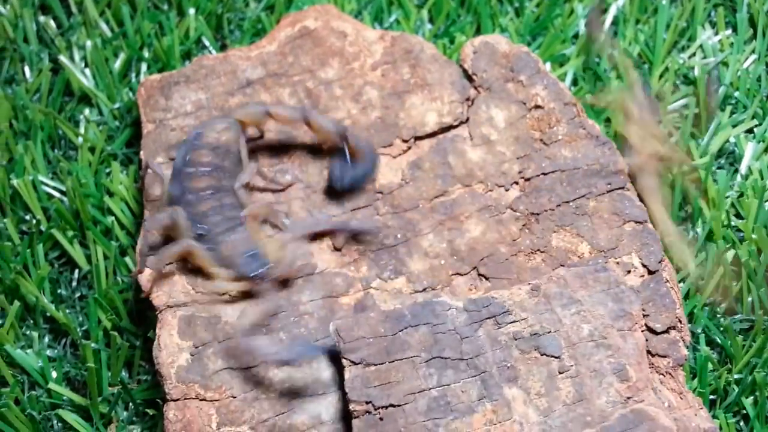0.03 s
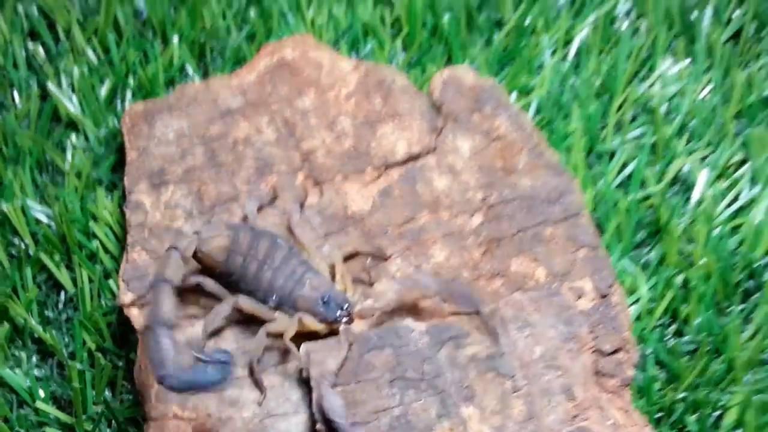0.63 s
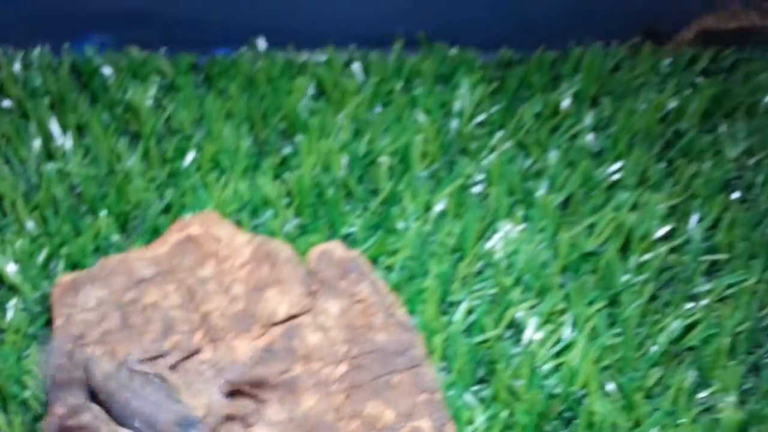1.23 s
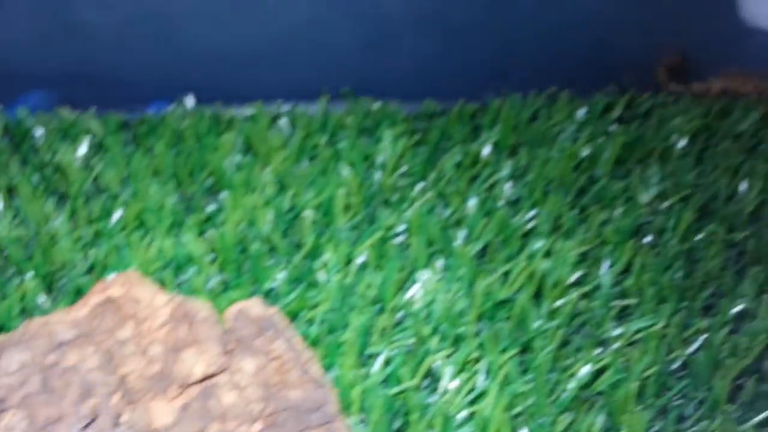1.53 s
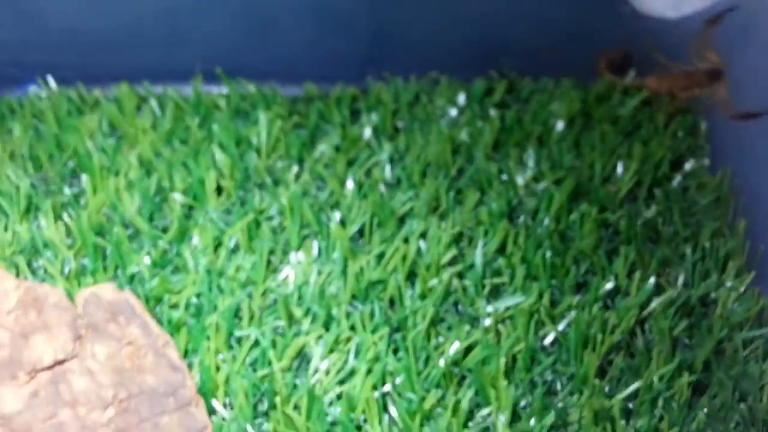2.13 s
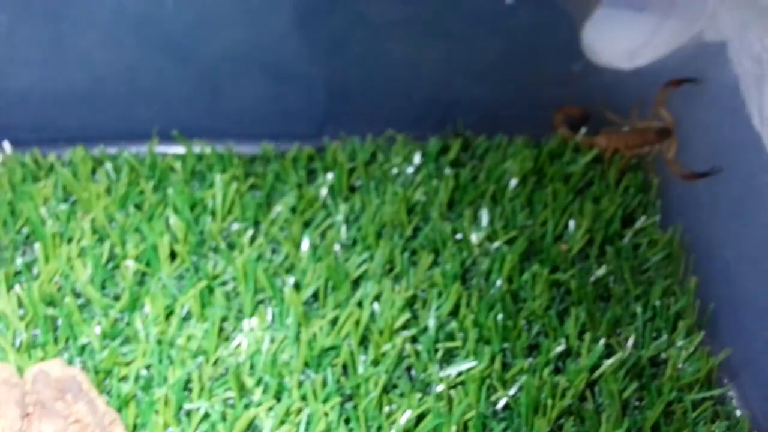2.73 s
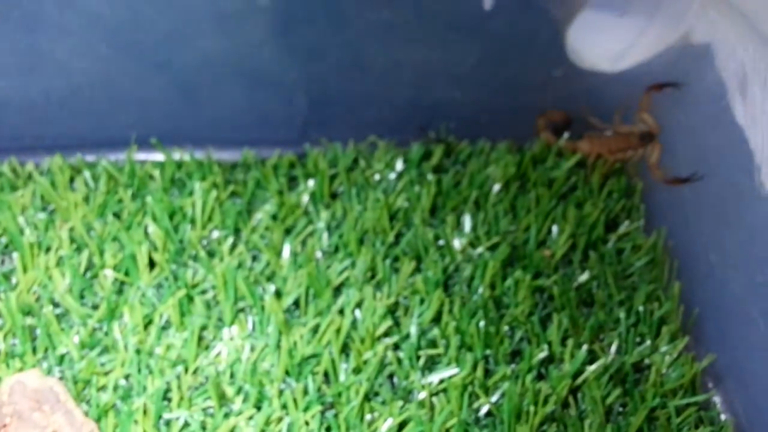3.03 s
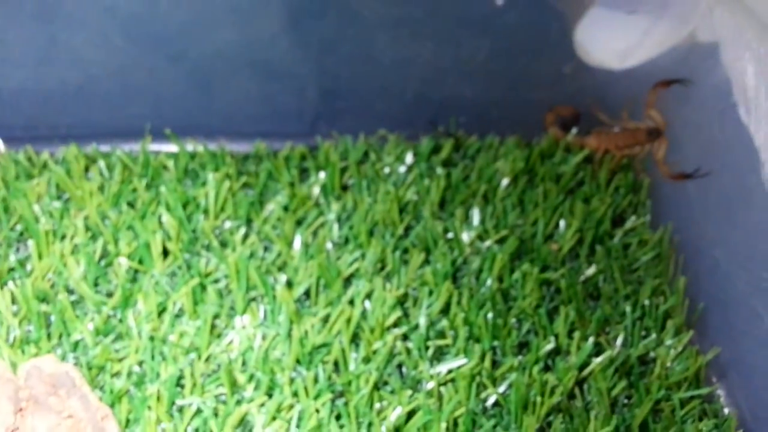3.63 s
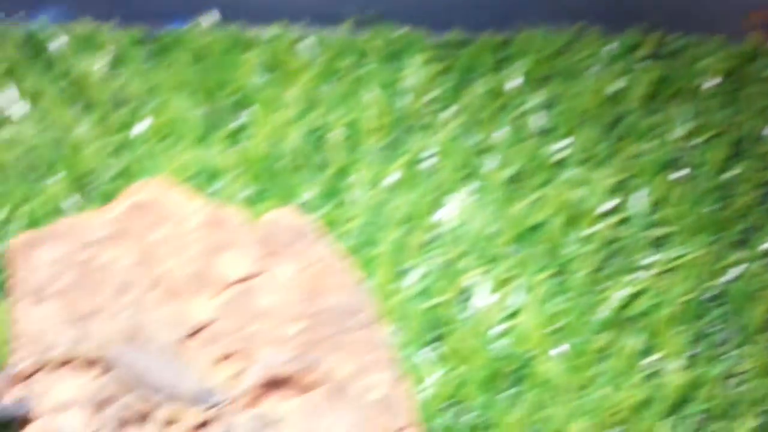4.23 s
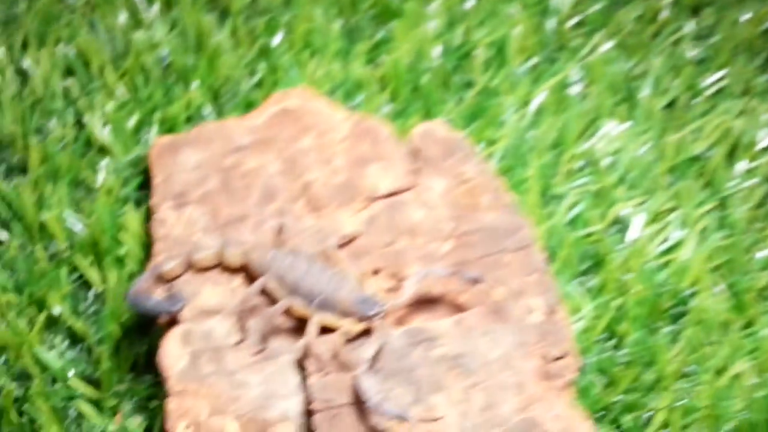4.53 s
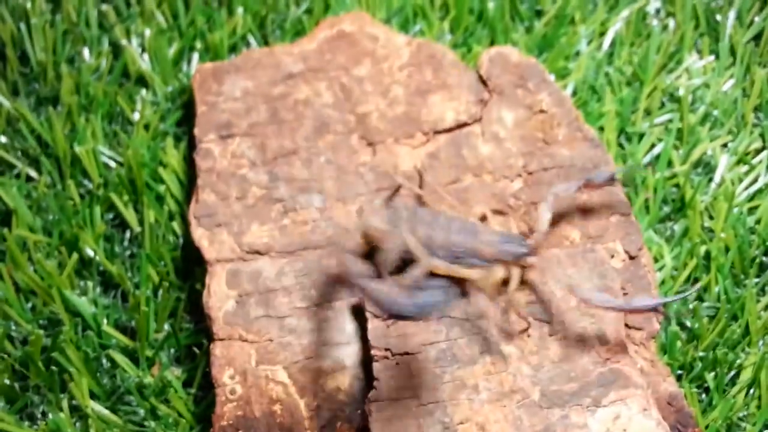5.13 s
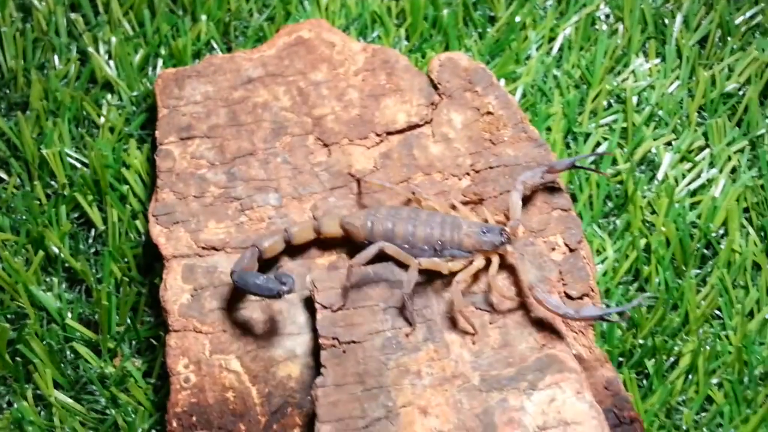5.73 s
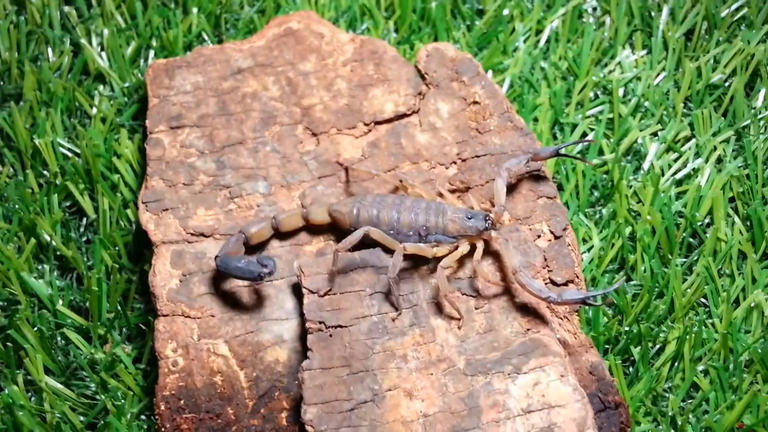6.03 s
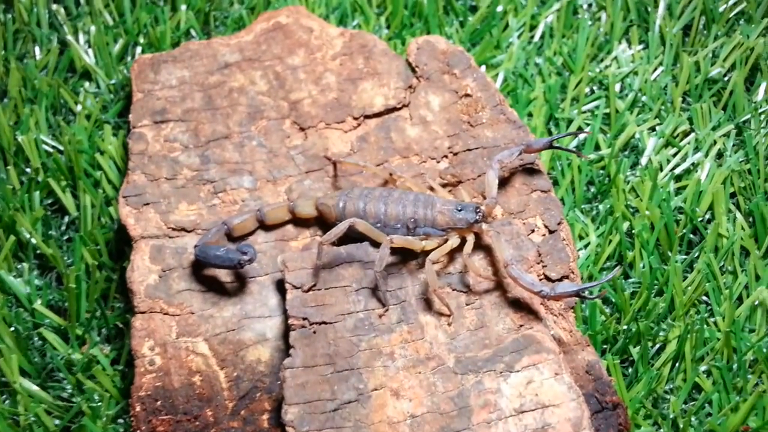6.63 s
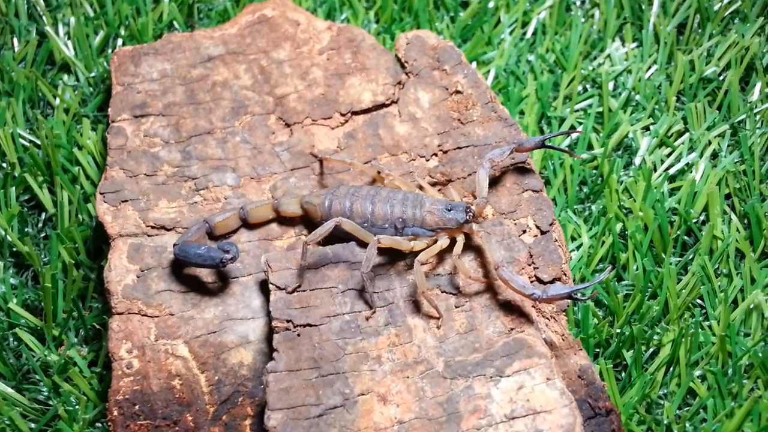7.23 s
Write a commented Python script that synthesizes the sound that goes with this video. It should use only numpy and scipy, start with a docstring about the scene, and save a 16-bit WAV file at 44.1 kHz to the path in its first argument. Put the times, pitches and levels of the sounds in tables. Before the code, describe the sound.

Scorpions scrabble over bark and artificial grass in a plastic tub, making a dry rustle with sharp ticks and short scrapes for about two seconds. Fingers thud against the microphone on the left, ending in one loud knock and a short rubbing groan. After a lull, a few more bumps, rubs and clicks follow. A small bird chirps far off throughout, over soft air noise and a fan in a quiet room.

```python
"""A dry rustle with sharp ticks and short scrapes: scorpions scrabble over bark and artificial grass
in a plastic tub. Their feet slip, snap and drag, and each touch makes the bark and tub ring.
Fingers bump and rub a hand-held camera beside its left microphone, making thuds, hiss and a groan.
Far off, a small bird chirps, and background hiss rises briefly around each chirp.
Air noise and a fan fill the quiet room; near the end the fan's soft whirr swells and fades."""
import sys
import numpy as np
from scipy import signal
from scipy.fft import rfft, irfft, next_fast_len
from scipy.io import wavfile
from scipy.ndimage import uniform_filter1d, map_coordinates

SR = 44100
rng = np.random.default_rng(int(sys.argv[2]) if len(sys.argv) > 2 else 0)


def file_out(sig):
    """Save sig as 16-bit WAV at sys.argv[1]."""
    # one column per channel
    cols = np.atleast_2d(sig).T
    # limit, then scale
    lim = np.clip(cols, -1, 1)
    pcm = np.round(lim * 32767).astype(np.int16)
    wavfile.write(sys.argv[1], SR, pcm)


N = 325017
TIME = np.arange(N) / SR

# Tone of the rustle, from low to high: f/Hz, level/dB
RUSTLE_TONE = [(200, -2), (400, -7), (550, 4), (750, -1.5), (1000, -1), (1600, -1.5), (2600, -0.5),
               (4000, -0.5), (7000, -0.5), (9000, -7.5), (11000, -13.5), (15000, -21)]
def rustle(slips_per_s=1150, clump_db=3, spread_db=5):
    """Feet make clumps of tiny slips, each with its own pitch, blurred by echoes inside the tub."""
    slipping = rng.random(N) < slips_per_s * from_db(clump_db * drift(60)) / SR
    sizes = from_db(spread_db * np.minimum(rng.exponential(1, N), 3))
    slips = slipping * sizes * rng.choice([-1, 1], N)
    slips = slips * (1 + 1.85 * rng.standard_normal((2, N)))  # different at each microphone
    pitches = np.geomspace(400, 13000, 20)
    choice = rng.integers(0, len(pitches), N)
    grains = rms_one(sum(resonate(slips * (choice == k), hz, hz / 4) for k, hz in enumerate(pitches)))
    blurred = late_left(grains) + from_db(.5) * echoes(grains, fade_s=.098)
    texture = rms_one(colour(tub(blurred, ring_db=-14), RUSTLE_TONE))
    return scrabbling() * from_db(1) * texture * pan(.73)


# Bursts of scrabbling: start t/s, length/s, level/dB
BURSTS = [(0.0, 0.38, -48), (0.462, 0.33, -50.5), (0.747, 0.64, -51), (1.447, 0.29, -51),
          (1.861, 0.012, -48), (1.988, 0.017, -48.5), (5.717, 0.02, -62)]
def scrabbling(attack_s=.023, settle_db=-8, slide_db=-24.5, slide_s=.014):
    """How strong the rustle is: feet move, the grass settles, claws slide on after loud ticks."""
    power = 0
    for start, length, db in BURSTS:
        feet = gesture(start, length, attack_s, release_s=.0098)
        grass = from_db(settle_db) * gesture(start, length, attack_s, release_s=.099)
        power = power + (from_db(db) * np.maximum(feet, grass)) ** 2
    for s, db, *_ in LOUD_TICKS:
        slide = from_db(db + slide_db) * np.exp(-TIME[:SR // 4] / slide_s)
        add(power, s, slide ** 2)
    return np.sqrt(power)


# The loudest snaps of claws, bark and grass blades:
# t/s, level/dB, brightness/(dB per octave), left minus right/dB, pitch f/Hz, bass cut f/Hz
LOUD_TICKS = [(0.0198, -31, -0.5, -3, 2220, 700), (0.0575, -35, -2.5, 2, 2000, 700),
              (0.0829, -35.5, 2, 3, 2040, 900), (0.1573, -34, 16, -7, 3480, 1500),
              (0.1965, -36.5, 35, -13, 3500, 1500), (0.345, -38, 16, -6, 3600, 1500),
              (0.471, -26.5, -1, 2, 2370, 587), (0.5054, -33.5, 12, -3, 2800, 1200),
              (0.552, -35.5, 1.5, 0, 2730, 1000), (0.656, -28, 2.5, 3, 1610, 600),
              (0.7768, -21.5, 7.5, -4, 1590, 500), (0.9168, -32.5, -0.5, -3, 3800, 1500),
              (0.9673, -29, 2, 0, 1800, 700), (0.973, -35.5, -3, 1, 2380, 900),
              (0.997, -39, 4, -6, 3900, 1500), (1.0071, -22.5, -1.5, -7, 2560, 436),
              (1.0101, -26, -2.5, 16, 1580, 503), (1.1278, -34, 0, 6, 3730, 1000),
              (1.366, -39.5, -3, 2, 2400, 1200), (1.4459, -35, -4.5, -1, 2620, 696),
              (1.551, -30.5, 11, -7, 2900, 1200), (1.622, -33.5, 17, 3, 3600, 1500),
              (1.6962, -35.5, 4, -3, 3440, 1193), (1.9148, -27.5, 2.5, -3.5, 1830, 800),
              (1.9727, -35, -4, 1, 1850, 700), (1.984, -36.5, -1, 3, 1850, 700),
              (4.874, -36.5, 17, 12, 3050, 1500), (5.332, -20.5, -1, -1, 3400, 1500),
              (7.197, -48.5, -1, 6, 1280, 900)]
# Tone of a snap: f/Hz, level/dB
SNAP_TONE = [(200, 20), (800, 3), (1900, 4), (2600, 2.5), (3500, -0.5), (4400, 2), (7400, -1), (9500, -9),
             (12000, -24), (15000, -31)]
def ticks(crack_s=.00079, rise_s=.000076, scatter_s=.0048, gain_db=-3.5):
    """A tiny crack reaches both microphones directly; the scatter after it is different at each."""
    out, t = np.zeros((2, N)), TIME[:SR // 20]
    for s, db, brightness, side_db, pitch_hz, cut_hz in LOUD_TICKS + light_ticks():
        noise = rng.choice([-1, 1], (3, len(t)))
        scatter = from_db(-11) * noise[:2] * np.exp(-t / scatter_s)
        crack = (noise[2] * np.exp(-t / crack_s) + scatter) * (1 - np.exp(-t / rise_s))
        ringing = tub(struck_spot(crack, pitch_hz), ring_db=-13)
        tone = [(hz, level + brightness * np.clip(np.log2(hz / 4000), -1, .7)) for hz, level in SNAP_TONE]
        snap = cut(colour(ringing, tone), cut_hz, "high", order=4)
        snap /= np.sqrt(np.mean(snap[:, :SR // 200] ** 2, axis=1, keepdims=True))  # by its first 5 ms
        add(out, s, late_left(snap) * from_db(db + gain_db) * pan(side_db))
    return out + from_db(-15.5) * echoes(out, fade_s=.13)


def light_ticks(per_s=12, pitch_hz=2800, cut_hz=900):
    """Lighter ticks fall at random within the bursts, as rows like those of LOUD_TICKS."""
    rows = []
    for start, length, db in BURSTS:
        after = np.cumsum(rng.uniform(.3, 1.7, 16)) / per_s
        strength, tilt, side, place = rng.standard_normal((4, 16))
        levels = db + 3 + 3 * strength
        pitches = pitch_hz * 2 ** (.42 * np.clip(place, -2, 2))
        candidates = np.c_[start + after, levels, 6 * (1 + tilt), 5 * side, pitches, np.full(16, cut_hz)]
        rows += list(candidates[after < length])
    return rows


# A claw drags over ridges of bark: start t/s, length/s, level/dB, pitch f/Hz
CLAW_DRAGS = [(0.562, 0.053, -55.5, 2830), (0.868, 0.036, -50.5, 2300), (1.021, 0.075, -48.5, 3570),
              (1.118, 0.048, -47.5, 2560), (1.198, 0.055, -52, 3530), (1.301, 0.042, -51, 3430)]
def scrapes(slips_per_s=320, spread_db=4, slip_s=.00051):
    """A dragged claw catches and slips unevenly, each slip a tiny crack that rings the bark."""
    out, t = np.zeros((2, N)), TIME[:SR // 5]
    for start, length, db, pitch_hz in CLAW_DRAGS:
        when = np.cumsum(rng.uniform(.3, 1.7, 64)) / slips_per_s
        sizes = from_db(spread_db * rng.standard_normal(len(when)))
        slips = sum(size * (t >= s) * np.exp(-np.abs(t - s) / slip_s)
                    for s, size in zip(when, sizes) if s < length)
        ringing = struck_spot(slips * rng.standard_normal(len(t)), pitch_hz)
        grit = cut(colour(ringing, SNAP_TONE), 1200, "high")
        add(out, start, from_db(db) * rms_one(grit) * np.sqrt(length / t[-1]))
    return late_left(out) + echoes(out, fade_s=.073)


def skid(start_s=.005, length_s=.12, hz=1920, db=-49):
    """A claw skids on the tub's wall: rubbing noise rings at one pitch in a short, rasping squeal."""
    squeal = rms_one(resonate_twice(rng.standard_normal((2, N)), hz, hz / 10))
    return from_db(db) * arch(start_s, length_s) * squeal


# Ringing notes of a struck spot: multiple of its pitch, width/Hz, level/dB
SPOT_NOTES = [(1, 190, 6), (1.85, 380, 7), (3.1, 450, 0)]
def struck_spot(x, pitch_hz):
    """Each spot of bark or grass rings with a pitch of its own."""
    return x + sum(from_db(db) * resonate(x, pitch_hz * ratio, width) for ratio, width, db in SPOT_NOTES)


# Ringing notes of the tub and bark: f/Hz, width/Hz, level/dB
TUB_NOTES = [(1420, 120, -17), (1830, 34, -12), (3730, 120, 9), (4990, 200, -3), (5240, 83, 6),
             (6840, 790, 6)]
def tub(x, ring_db):
    """A touch is heard directly and through the ringing of tub and bark."""
    return x + sum(from_db(ring_db + db) * resonate(x, hz, width) for hz, width, db in TUB_NOTES)


# Fingers bump the camera case: t/s, thud level/dB, rough pitch f/Hz, grit level/dB, scuff time/s
FINGER_BUMPS = [(0.223, -29, 534, -31.5, 0.0019), (0.2324, -25, 520, -46, 0.0012),
                (0.235, -13.5, 383, -34.5, 0.0023), (0.2741, -19, 286, -33.5, 0.0019),
                (0.62, -25, 470, -38, 0.0023), (0.697, -22, 287, -50, .003),
                (0.814, -18.5, 373, -52, 0.0024), (0.8537, -24, 320, -46, 0.0029),
                (0.956, -24, 437, -49, 0.0018), (1.0151, -16, 286, -42, 0.0027),
                (1.1125, -14, 395, -37, 0.00243), (1.17, -14.5, 375, -37, .001),
                (1.1746, -21, 392, -40.5, 0.0021), (1.214, -18.5, 294, -44, 0.0046),
                (1.403, -17, 402, -38.5, .0012), (1.49, -17, 342, -40.5, 0.0016),
                (1.594, -17, 373, -35.5, 0.0014), (1.6, -15.5, 334, -39, 0.0021),
                (1.675, -21, 296, -42, 0.0013), (1.684, -25, 350, -41, .003),
                (2.0352, -10.5, 423, -21, 0.0025), (2.0391, 0, 393, -22, 0.0016),
                (2.055, -10.5, 456, -34, 0.0018), (3.427, -24, 500, -59, 0.0024),
                (4.847, -22, 650, -32, .004), (4.945, -14, 477, -30, 0.00089),
                (4.9713, -28, 337, -37, 0.00033), (5.2246, -15, 384, -28.5, 0.0013),
                (5.304, -21, 436, -39, .0007), (5.5408, -29.5, 450, -49, 0.0013)]
# Tone of skin sliding on the case: f/Hz, level/dB
SKIN_TONE = [(100, -3), (200, 11.5), (500, 16), (900, 5), (1600, 7), (2600, 1.5), (4000, -2), (6200, 0.5),
             (8500, -7.5), (11000, -17), (15000, -30)]
def bumps(fade_cycles=.31, ring_hz=1300, grit_gain_db=2.5, judder_db=-10):
    """A bump pushes the case in and out; the fingertip scuffs and judders, never ringing the same."""
    out, t = np.zeros(N), TIME[:SR // 25]
    for s, db, hz, grit_db, scuff_s in FINGER_BUMPS:
        cycles = hz * t * (.6 + .5 * np.exp(-t / .0027))  # the swing slows as the soft fingertip settles
        fade = np.exp(-cycles / (fade_cycles * rng.uniform(.85, .95)))
        thud = -np.sin(2 * np.pi * cycles) * (1 - np.exp(-cycles / .38)) * fade
        scuff = rng.standard_normal(len(t)) * t * np.exp(-t / scuff_s)
        ring = resonate(scuff, ring_hz * 2 ** rng.uniform(-.73, .42), width=320)
        grit = cut(colour(scuff + from_db(-4) * ring, SKIN_TONE), 680, "high")
        grit /= np.sqrt(np.sum(grit ** 2) / (SR // 150))
        judder = resonate_twice(scuff, hz, hz)
        knock = thud / np.abs(thud).max() + from_db(judder_db) * judder / np.abs(judder).max()
        add(out, s, from_db(db) * knock)
        add(out, s - scuff_s / 2, from_db(grit_db + grit_gain_db) * grit)
    return cut(out, 115, "high")


# Fingers slide on the case: start t/s, length/s, level/dB
FINGER_STROKES = [(0.766, 0.017, -37), (2.026, 0.14, -35.5), (4.455, 0.062, -52.5), (4.654, 0.011, -45),
                  (4.744, 0.007, -40.5), (4.794, 0.024, -51.5), (4.843, 0.0065, -36.5),
                  (4.928, 0.023, -47.5), (5.055, 0.016, -50), (5.154, 0.064, -42), (5.533, 0.0058, -58),
                  (7.198, 0.0072, -47.5)]
def rubbing(gain_db=1, rough_db=2):
    """Skin sliding over the case makes a rough hiss."""
    pressure = sum(from_db(db) * gesture(start, length) for start, length, db in FINGER_STROKES)
    roughness = from_db(gain_db + rough_db * drift(350))
    hiss = rms_one(colour(rng.standard_normal(N), SKIN_TONE))
    return cut(pressure * roughness * hiss, 73, "high")


def groan(start_s=2.063, length_s=.084, db=-24, fade_db_per_s=104, start_hz=390, rise_hz_per_s=2300):
    """A finger drags hard, sticking and slipping: higher as it speeds up, quieter as it lets go."""
    since = np.clip(TIME - start_s, 0, length_s)
    level = gesture(start_s, length_s) * from_db(db - fade_db_per_s * since)
    hz = (start_hz + rise_hz_per_s * since) * (1 + .15 * drift(600))
    tone = np.sin(2 * np.pi * np.cumsum(hz) / SR) * from_db(3.5 * drift(220))
    rasp = rms_one(resonate(rng.standard_normal(N), hz=400, width=250))
    return level * rms_one(tone + .55 * rasp)


# The bird's main calls: middle t/s, level/dB
BIRD_CALLS = [(0.617, -43.5), (1.488, -45.5), (2.079, -45), (2.841, -43.5), (3.64, -45.5), (4.832, -44),
              (6.254, -43.5), (7.315, -44)]
# Its other thin peeps: middle t/s, length/s, f/Hz, pitch glide/Hz, level/dB
BIRD_PEEPS = [(0.487, 0.091, 5180, -51, -48), (0.561, 0.044, 5190, -100, -46.5),
              (4.804, 0.043, 4910, -100, -49.5), (4.875, 0.037, 5120, 95, -52),
              (5.648, 0.062, 5800, 700, -66), (6.125, 0.035, 5600, 206, -64.5)]
def bird_notes(length_s=.056, call_hz=4930, glide_hz=-240, lead_hz=4770):
    """All the notes: falling chirps, no two alike, a faint lead-in to each, and the peeps."""
    vary = 1 + .2 * rng.uniform(-.77, 1, (len(BIRD_CALLS), 2))
    calls = [(s, length_s * slow, call_hz, glide_hz * steep, db)
             for (s, db), (slow, steep) in zip(BIRD_CALLS, vary)]
    leads = [(s - .031, length_s, lead_hz, 0, db - 19) for s, db in BIRD_CALLS]
    return calls + leads + BIRD_PEEPS


def bird(notes, buzz_depth_hz=120, buzzes_per_s=110):
    """Thin, buzzy gliding whistles with a short trail of echoes."""
    song = np.zeros(N)
    for s, length, hz, glide_hz, db in notes:
        along = np.linspace(-.5, .5, int(length * SR))
        buzz_cycles = buzzes_per_s * along * length * rng.uniform(.75, 1.16) + rng.random()
        pitch = hz + glide_hz * along + buzz_depth_hz * np.sin(2 * np.pi * buzz_cycles)
        loudness = from_db(db) * np.cos(np.pi * along)
        add(song, s - length / 2, loudness * np.sin(2 * np.pi * np.cumsum(pitch) / SR))
    return (song + from_db(.5) * echoes(song, fade_s=.12)) * pan(3.9)


def background_hiss(notes, gain_db=-3, late_s=.0062):
    """Background hiss rises briefly around each chirp."""
    swell = sum(from_db(db) * arch(s - length / 2 + late_s, length) for s, length, _, _, db in notes)
    tone = [(1000, 11), (3000, .5), (5500, 0), (9000, -3.5), (14000, -12)]
    hiss = rms_one(colour(rng.standard_normal((2, N)), tone))
    return from_db(gain_db) * uniform_filter1d(swell, size=2600) * hiss * pan(3.9)


# Tone of the room's air: f/Hz, level/dB
AIR_TONE = [(15, -40), (35, -26), (53, 1.5), (93, 4), (207, -11), (301, -11), (335, -7.5), (373, -18.5),
            (438, -23), (655, -13), (2700, -25.5), (3200, -30.5), (13800, -39.5), (15000, -59)]
# How alike it is at the two microphones: f/Hz, likeness (0 or less: unrelated, 1 or more: the same)
AIR_LIKENESS = [(40, 9), (100, 0.7), (250, 0.4), (600, 2.35), (2000, -0.67), (12000, 0.28)]
# Which side it leans to: f/Hz, left minus right/dB
AIR_BALANCE = [(60, -2), (200, 3.5), (600, 8.5), (2000, 8), (6000, 4), (14000, -1)]
def air(db=-50):
    """Steady air noise, alike at both microphones in the deep bass."""
    hz = np.fft.rfftfreq(N, 1 / SR)
    alike = np.clip(at_hz(AIR_LIKENESS, hz), 0, 1)
    shared, opposed = rfft(rng.standard_normal((2, N)))
    side = np.array([[1], [-1]])
    noise = np.sqrt(1 + alike) * shared + side * np.sqrt(1 - alike) * opposed
    tone = from_db(at_hz(AIR_TONE, hz) + side * at_hz(AIR_BALANCE, hz) / 2)
    return from_db(db) * rms_one(irfft(noise * tone, N))


# The fan's hums and whirrs: f/Hz, width/Hz, level/dB
FAN_NOTES = [(58.9, 9.1, -60), (267.8, 48, -59.5), (301.6, 21, -59), (367.4, 87, -54), (2560, 200, -81.5),
             (5080, 340, -79.5)]
def fan(gain_db=-2):
    """A distant fan drones in a few narrow bands of noise."""
    noise = rng.standard_normal(N) + .34 * rng.standard_normal((2, N))
    return sum(from_db(db + gain_db) * rms_one(resonate_twice(noise, hz, width))
               for hz, width, db in FAN_NOTES)


def whirr_swell(start_s=6.4, length_s=.85, hz=2400, db=-67):
    """The fan's soft, fluttering whirr swells and fades."""
    swell = arch(start_s, length_s) * from_db(3 * drift(30))
    return from_db(db) * swell * rms_one(resonate_twice(rng.standard_normal((2, N)), hz, hz / 3))


# The room's noise rises and falls as the camera moves: t/s, air level/dB, fan level/dB
ROOM_SWELLS = [(0, -1, 6), (.9, 5.5, 7.5), (1.5, 6, 3.5), (2.3, 0, 2), (2.8, 5.5, 2), (3.4, 2, 1.5),
               (4.3, 0.5, 1.5), (4.6, 5, 3.5), (5.6, 1, 0), (6.8, 1.5, -0.5), (7.37, -2, -0.5)]
def room(waver_db=1.2):
    """Air and fan swell slowly and waver a little; the air's deep bass mostly escapes the swells."""
    times, *levels = np.transpose(ROOM_SWELLS)
    air_gain, fan_gain = [from_db(np.interp(TIME, times, db)) for db in levels]
    steady = air()
    swelling = steady + (air_gain - 1) * cut(steady, 130, "high", order=1)
    return (swelling + fan_gain * fan()) * from_db(waver_db * drift(14))


def from_db(db):
    """Turn decibels into a number to multiply by."""
    return 10 ** (np.asarray(db) / 20)


def rms_one(x):
    """Scale to an average strength (rms) of one."""
    return x / np.sqrt(np.mean(x ** 2) + 1e-20)


def at_hz(points, hz):
    """Read between a table's rows, with octaves evenly spaced."""
    f, value = np.transpose(points)
    return np.interp(np.log(np.maximum(hz, 1)), np.log(f), value)


def colour(x, tone):
    """Give a sound a tone without smearing it earlier in time (a minimum-phase filter)."""
    size = 2 * next_fast_len(x.shape[-1] // 2 + 2048)
    cepstrum = irfft(np.log(from_db(at_hz(tone, np.fft.rfftfreq(size, 1 / SR)))))
    fold = np.r_[1, np.full(size // 2 - 1, 2), 1, np.zeros(size // 2 - 1)]
    return irfft(rfft(x, size) * np.exp(rfft(cepstrum * fold)))[..., :x.shape[-1]]


def cut(x, hz, keep, order=2):
    """Keep the "low" or "high" side of a frequency."""
    return signal.sosfilt(signal.butter(order, hz, keep, fs=SR, output="sos"), x)


def resonate(x, hz, width):
    """Ring at one pitch; a smaller width rings longer."""
    r = np.exp(-np.pi * width / SR)
    feedback = [1, -2 * r * np.cos(2 * np.pi * hz / SR), r * r]
    return signal.lfilter((1 - r * r) / 2 * np.array([1, 0, -1]), feedback, x + 1e-18)


def resonate_twice(x, hz, width):
    """Pick out one pitch more sharply."""
    return resonate(resonate(x, hz, width), hz, width)


def drift(turns_per_s):
    """A random wander, about one in size."""
    knots = rng.standard_normal(8192)
    return rms_one(map_coordinates(knots, [TIME * turns_per_s], order=1, mode="wrap"))


def gesture(start, length, attack_s=.0018, release_s=.022):
    """A level that rises, holds and dies away."""
    before, after = np.maximum(start - TIME, 0), np.maximum(TIME - start - length, 0)
    return np.exp(-before / attack_s - after / release_s) + 1e-9


def arch(start, length):
    """A level that swells and fades in one smooth hump."""
    return np.sin(np.pi * np.clip((TIME - start) / length, 0, 1))


def pan(db):
    """Left and right gains; positive leans left."""
    return from_db(np.array([[db], [-db]]) / 2)


def late_left(x, lag_samples=2):
    """The feet are nearer the right microphone, so the left hears them a moment later."""
    return np.array([np.pad(x[0], (lag_samples, 0))[:x.shape[1]], x[1]])


def add(out, s, sound):
    """Mix a sound in at a time."""
    i = max(round(s * SR), 0)
    out[..., i:i + sound.shape[-1]] += sound[..., :N - i]


def echoes(x, fade_s):
    """A wash of reflections, different at each microphone, falling 60 dB in fade_s."""
    t = TIME[:SR // 2]
    tail = rng.standard_normal((2, len(t))) * from_db(-60 * t / fade_s) * (t > .002)
    return signal.fftconvolve(np.atleast_2d(x), tail / np.sqrt(np.sum(tail ** 2) / 2), axes=1)[:, :N]


def scene():
    """Mix everything; the fingers are heard almost only on the left."""
    scorpions = rustle() + scrapes() + ticks() + skid()
    fingers = bumps() * from_db([[0], [-38]]) + (rubbing() + groan()) * from_db([[0], [-22]])
    notes = bird_notes()
    return scorpions + fingers + bird(notes) + background_hiss(notes) + whirr_swell() + room()


def record(dry, limit=.92, top_hz=14900):
    """The loudest peaks are held just below full scale, and the highest treble is cut."""
    treble_cut = signal.ellip(10, .2, 70, top_hz, fs=SR, output="sos")
    return signal.sosfilt(treble_cut, np.clip(dry, -limit, limit))


dry = scene()
out = record(dry)
file_out(out)
```